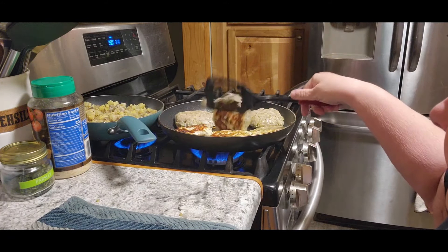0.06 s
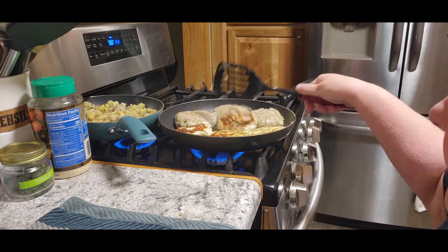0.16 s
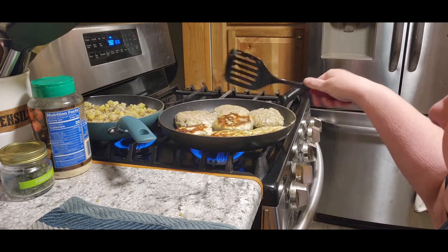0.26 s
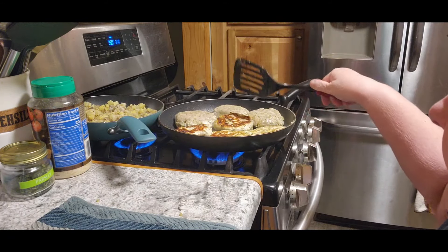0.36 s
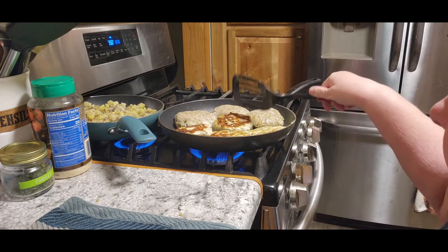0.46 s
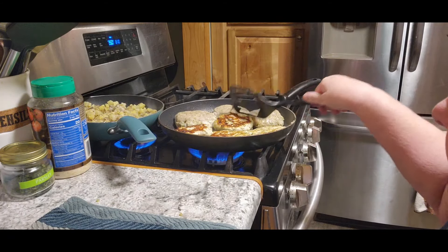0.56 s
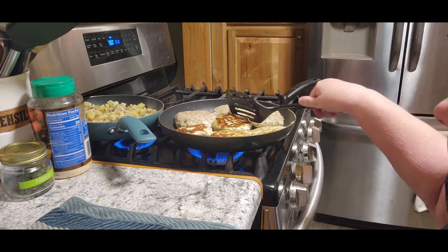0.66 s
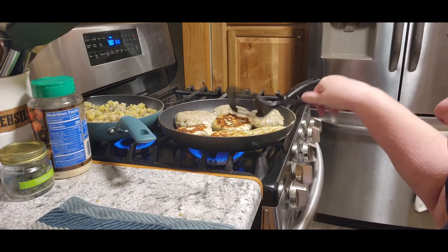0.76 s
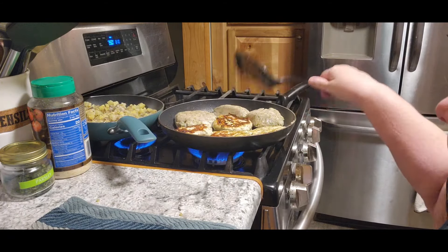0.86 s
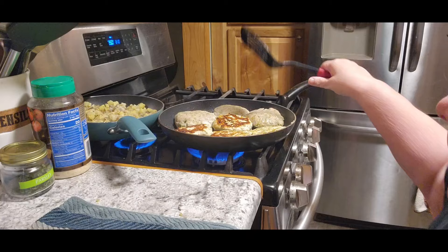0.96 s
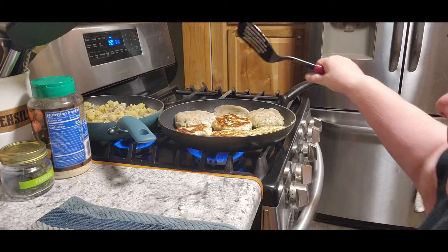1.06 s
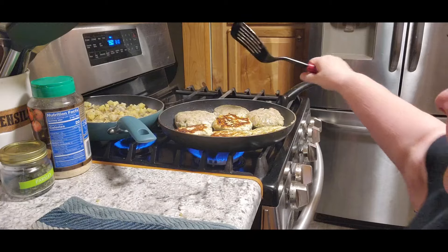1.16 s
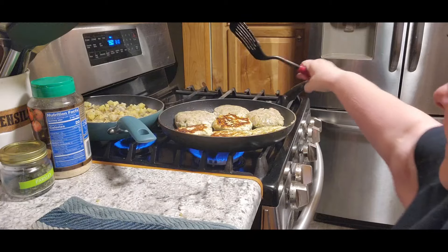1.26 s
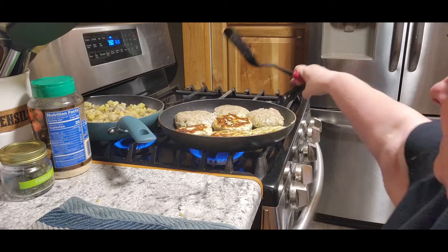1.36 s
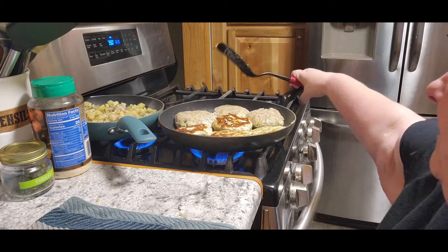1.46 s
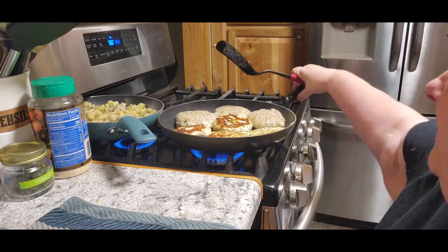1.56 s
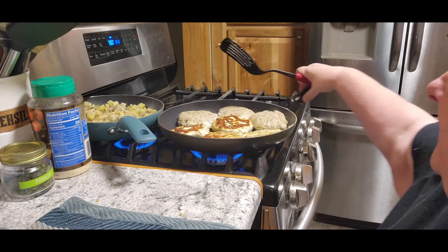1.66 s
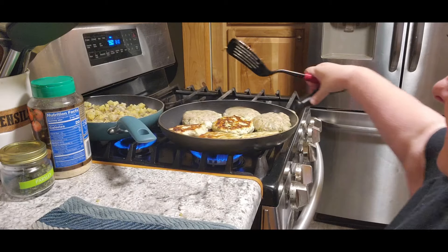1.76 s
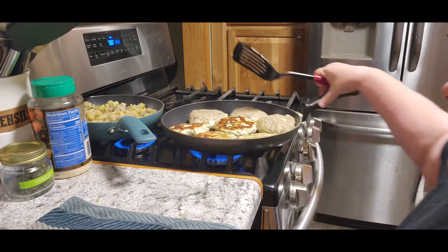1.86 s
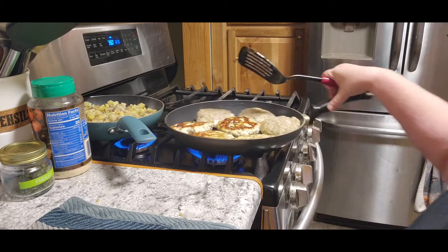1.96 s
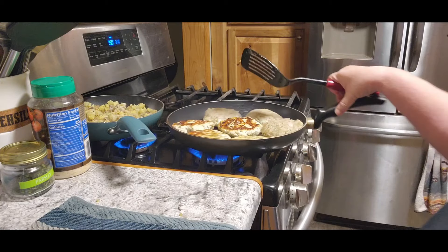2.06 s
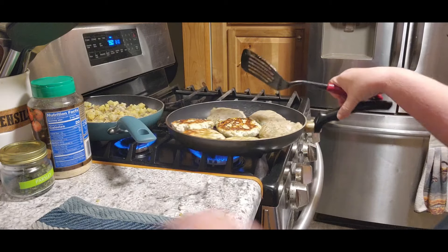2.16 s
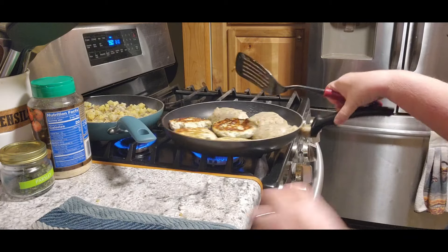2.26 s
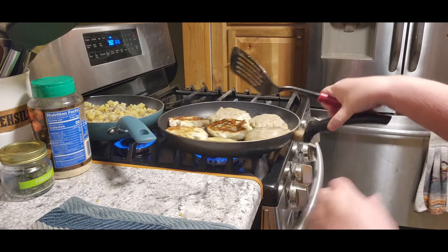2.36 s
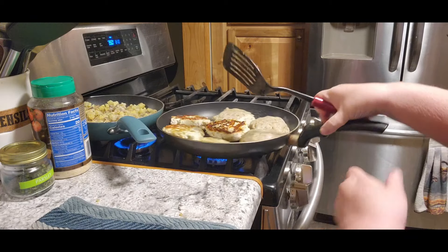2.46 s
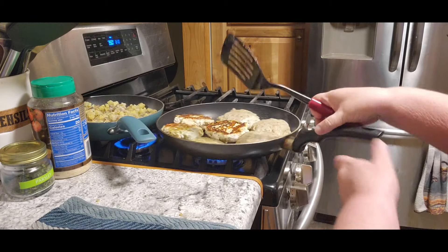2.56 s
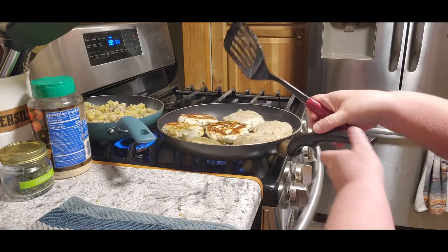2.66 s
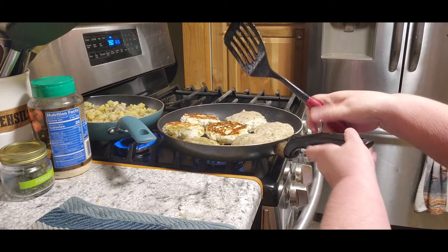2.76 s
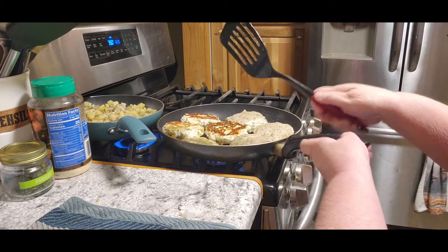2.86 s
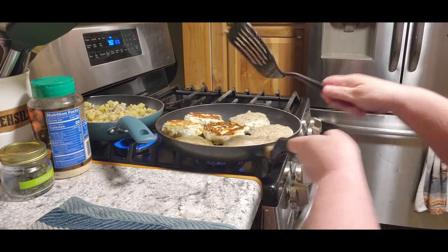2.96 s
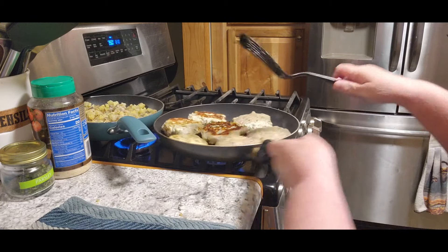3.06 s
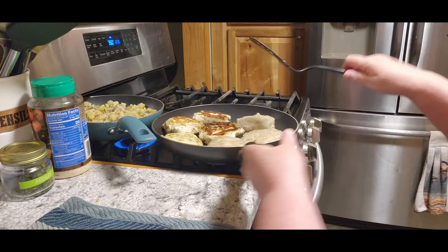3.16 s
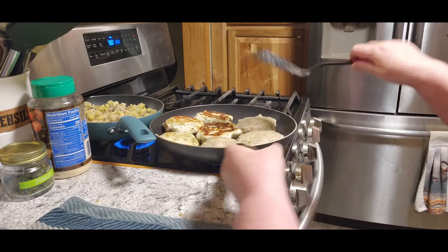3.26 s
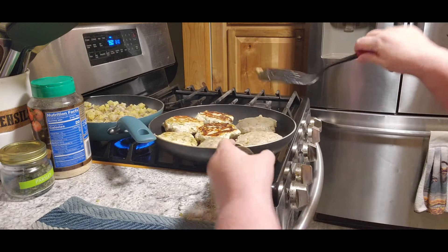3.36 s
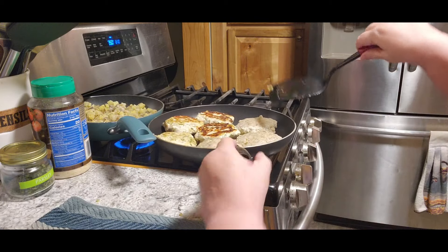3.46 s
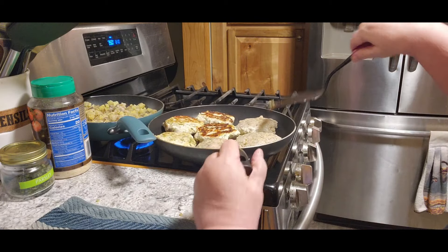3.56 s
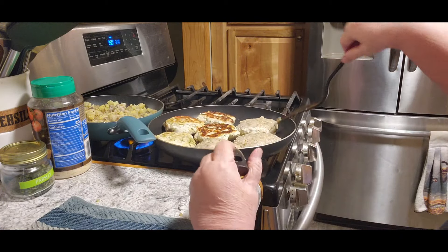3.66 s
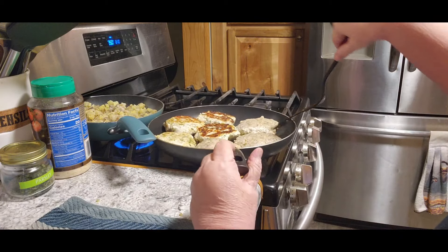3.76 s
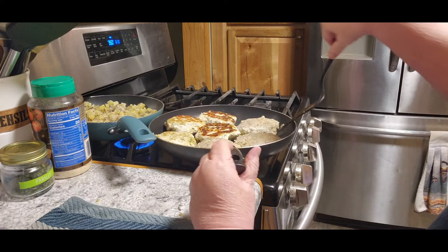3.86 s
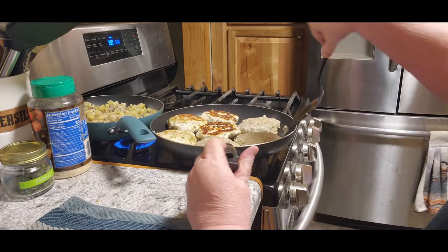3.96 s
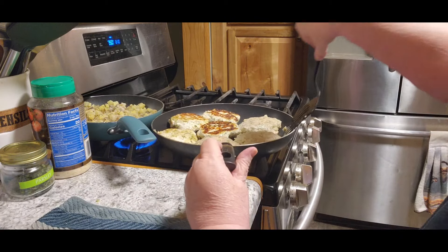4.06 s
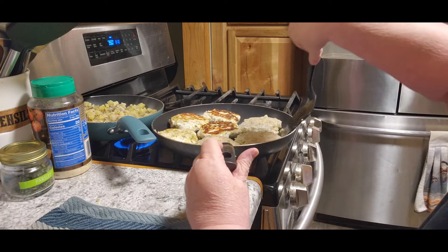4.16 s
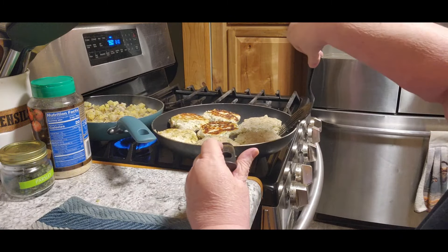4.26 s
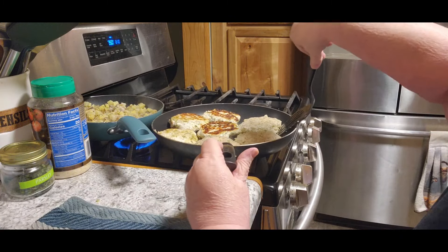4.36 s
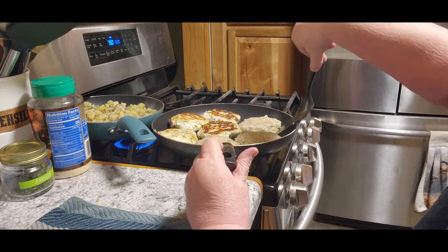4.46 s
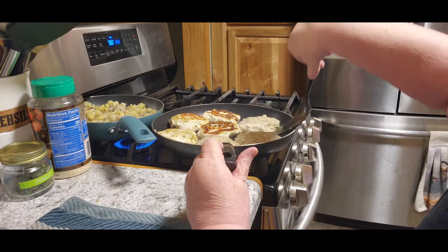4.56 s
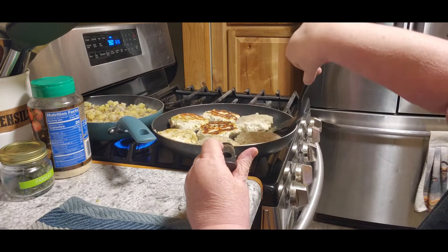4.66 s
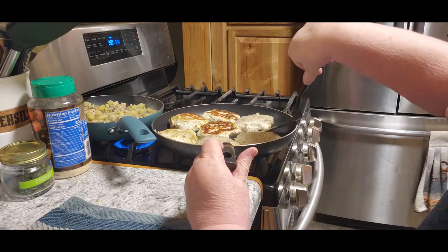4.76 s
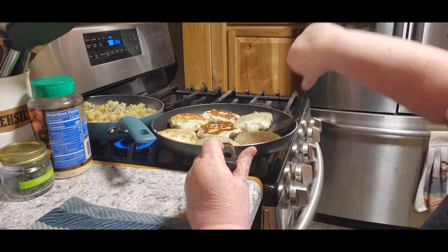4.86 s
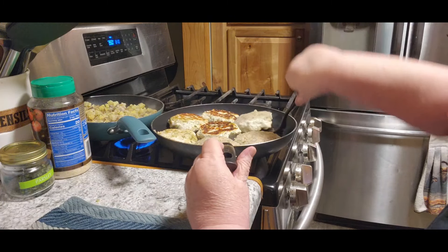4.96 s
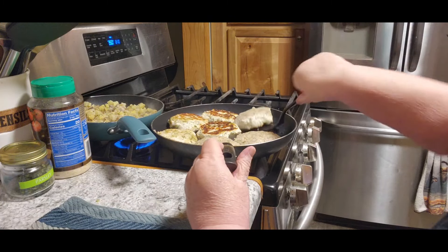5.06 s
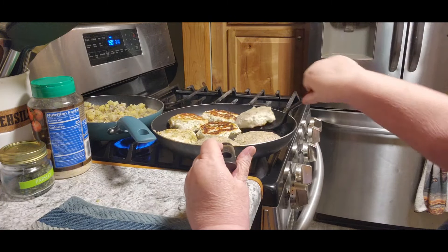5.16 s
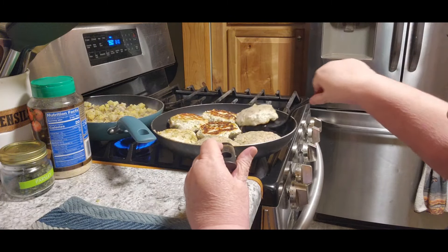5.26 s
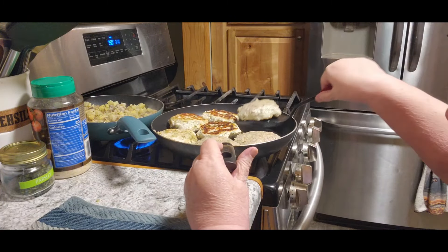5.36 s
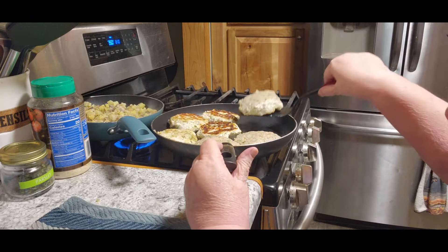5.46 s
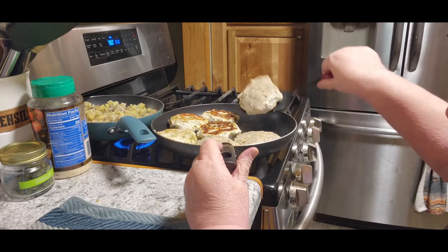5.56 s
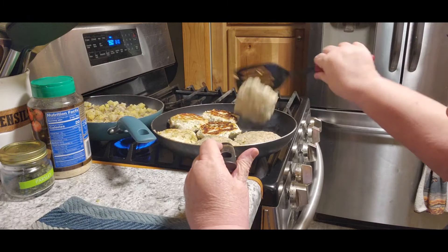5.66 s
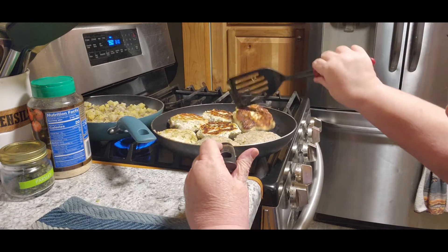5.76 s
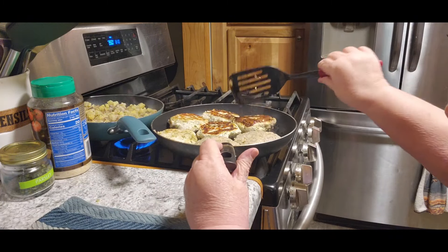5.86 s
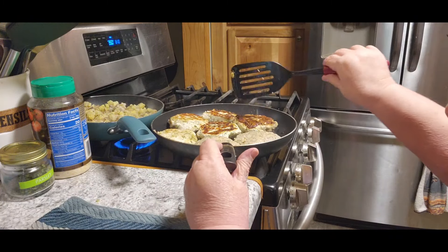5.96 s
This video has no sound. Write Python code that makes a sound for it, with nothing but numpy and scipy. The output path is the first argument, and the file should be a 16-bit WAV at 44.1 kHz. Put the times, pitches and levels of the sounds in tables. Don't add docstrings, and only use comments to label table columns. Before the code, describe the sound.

Meat patties sizzle steadily in hot oil in a skillet, with sharp pops, fat spits, faint pan knocks and low kitchen rumble.

```python
import sys
import numpy as np
from scipy import signal
from scipy.fft import rfft, irfft, next_fast_len
from scipy.io import wavfile
from scipy.ndimage import uniform_filter1d, map_coordinates

SR = 44100
rng = np.random.default_rng(int(sys.argv[2]) if len(sys.argv) > 2 else 0)


def magnitude_from_level(level_db):
    exponent = np.asarray(level_db, float) / 20
    return 10 ** exponent


def unload_audio(sound):
    columns = np.transpose(np.atleast_2d(sound))
    steps = np.round(np.clip(columns, -1, 1) * 32767)
    wavfile.write(sys.argv[1], SR, steps.astype(np.int16))


N = 265028

# (time [s], level [dB])
VIGOUR = [(0, -37), (.13, -37), (.2, -35), (.66, -36), (.85, -38), (1.0, -36.5), (1.68, -39), (1.81, -36),
          (1.93, -39), (2.05, -36), (2.45, -38.5), (2.8, -38), (3.9, -37.5), (4.85, -37), (5.05, -34),
          (5.24, -33.5), (5.39, -38.5), (5.47, -35.5)]
# (frequency [Hz], density [dB])
SIZZLE_SPECTRUM = [(1470, -39), (2500, -14.5), (3900, -5.5), (5560, 2), (6810, -3.5), (7590, 1.5),
                   (8610, -6.5), (10500, -12), (13600, -8.5), (22000, -120)]
SPRAY_SPECTRUM = [(5590, -31), (9500, -1.5), (10900, -2.5), (14300, 6), (14900, 5.5), (15500, 8.5),
                  (16000, 0)]
GURGLE_SPECTRUM = [(440, -28), (750, -10.5), (1260, -3), (1360, -6.5), (1440, -2), (1800, -1.5), (1930, -2),
                   (2140, 0.5), (2480, -2.5), (3200, -3), (4160, -8), (7040, -120)]
VENT_SPECTRUM = [(6300, -46), (7100, -8.5), (7450, -1), (7800, -5), (8150, -12), (9000, -40)]
SING_SPECTRUM = [(1900, -30), (2060, -5), (2150, 3), (2250, -12.5), (2450, -43)]
MURMUR_SPECTRUM = [(120, -31), (210, -13.5), (280, 0.5), (318, -8.5), (381, 1.5), (424, -9), (463, 1),
                   (499, -2.5), (598, -1.5), (850, -0.5), (1100, -10.5), (1870, -120)]
DRONE_SPECTRUM = [(32, -23), (52, -5), (81, -1), (97, -0.5), (120, 4), (146, 5), (162, 3), (215, -6),
                  (260, -15), (340, -45), (570, -120)]
RUMBLE_SPECTRUM = [(8.8, -29), (15, -15), (32, 13), (62, -8), (81, -39), (140, -120)]
# (time [s], lift [dB], fall [s], extra spray [dB])
FLARES = [(.2, -1.5, 0.071, 9), (.3, 0, .03, -3), (.46, 4, 0.02, -6), (.53, -2.5, .035, 2),
          (.585, 2, 0.018, -5), (.64, 3.5, 0.092, -3.5), (1.0, 1.5, 0.017, -1), (1.25, 1, 0.013, 4),
          (1.42, 3, 0.022, -1), (1.524, -3, .011, -8), (1.559, -0.5, 0.02, -1), (2.129, -1.5, .017, 8),
          (2.32, -0.5, .03, -2), (2.383, 4, 0.028, -9), (2.45, -1.5, .03, -2), (2.76, 2, 0.028, 3),
          (3.0, 2, 0.0099, -4), (3.1, 1, .015, -3), (3.27, 2, 0.013, 1), (3.38, 0.5, 0.0083, 5),
          (3.51, 0.5, 0.046, 2), (3.653, 2, 0.031, -4), (3.7, 0, .02, 6), (3.83, -0.5, 0.037, 4),
          (4.15, 2, 0.026, 1), (4.4, 5, 0.012, -17), (4.669, 1, 0.046, -2), (4.778, 5, 0.024, 1.5),
          (4.985, 0, 0.042, 8), (5.19, 0.5, 0.018, 4), (5.43, 0.5, 0.025, 2), (5.621, 2, 0.0076, 1),
          (5.946, -0.5, 0.01, 8), (5.985, -2, .03, 4.5)]
# (time [s], held [s], change [dB])
LULLS = [
    (.8, 0.22, 0),
    (1.25, 0.33, -2),
    (2.5, 0.48, 0),
    (3.0, .6, -1),
    (4.2, 0.53, -1),
    (5.32, 0.091, 1),
    (5.5, 0.23, -1.5),
]
# (time [s], peak [dB], ring [Hz], t60 [s], left minus right [dB])
SPITS = [(.2583, -30, 2160, .05, 1), (0.3933, -15, 1980, 0.062, 2), (0.6634, -13, 2050, 0.025, 7),
         (1.107, -17, 1453, 0.086, 2), (1.3174, -22, 2140, 0.063, 2.0), (1.7944, -15, 2260, 0.04, -5),
         (1.824, -18, 1650, 0.055, 1), (1.995, -17.5, 1730, 0.056, 1), (3.652, -33, 2120, .05, 1),
         (3.686, -2, 2600, 0.012, 1), (3.692, -5, 2380, 0.018, 5), (3.697, -10, 2330, 0.02, -1),
         (3.6865, -16, 3000, .02, 5), (3.711, -19, 2400, .02, 2), (3.7644, -18.5, 2080, 0.11, -1),
         (4.402, -18, 1080, 0.05, 1), (4.6706, -17, 1250, 0.068, 2), (4.772, -19, 2340, 0.06, 4),
         (4.7755, -25, 1800, 0.018, 2), (4.863, -19, 1700, 0.08, 2), (5.1557, -20, 1980, .04, 4),
         (5.216, -23, 1680, 0.092, 3), (5.235, -22, 2290, 0.065, 10), (5.2544, -19, 2160, 0.08, 12),
         (5.4146, -10.5, 2010, .03, 2), (5.744, -31, 2330, 0.04, 5), (5.8394, -13, 2040, 0.066, -1),
         (5.895, -18, 2154, 0.091, 1), (5.9394, -37, 2880, 0.04, 9)]
# (time [s], strength [dB], ring [Hz], left
# minus right [dB])
POPS = [(0.0302, -19, 5340, 3.3), (0.0776, -22.5, 7700, 7), (0.153, -23, 7620, 3), (0.3295, -28, 5749, 2.8),
        (0.3415, -28.1, 6610, 3.3), (0.4657, -25, 7800, 1.7), (0.5865, -21, 7900, 0.9),
        (0.6673, -26.2, 7751, 1.0), (1.252, -24, 7500, 2.8), (1.2614, -23, 6270, 3.5),
        (1.4106, -22, 7500, 3), (1.4605, -28.8, 7800, 3), (1.4749, -28.8, 7900, 1.6),
        (1.5248, -18, 5300, -1), (1.5338, -30.4, 5240, 2.1), (1.5604, -23, 5800, 3.2),
        (1.5677, -25, 5260, 1.2), (1.5838, -25, 5270, 3.6), (1.6327, -33, 5340, 2.8),
        (1.704, -28, 6287, -2), (1.7513, -29.2, 6180, 4), (1.8631, -23, 6430, 0.2), (2.06, -25, 5684, 3),
        (2.1292, -18.5, 5630, 3.1), (2.1759, -24, 7751, -1), (2.3834, -23, 5500, 0.9),
        (2.4662, -34, 6072, 2.9), (2.5071, -26, 5500, 4), (2.6393, -27, 7600, 7),
        (3.0015, -30.1, 7622, 2.4), (3.0998, -29.8, 4270, 4.0), (3.1087, -27, 5550, 2.6),
        (3.1636, -21, 5200, 1.9), (3.226, -27, 4900, -1), (3.3242, -48, 5490, -3), (3.365, -25, 5500, 0.3),
        (3.4284, -25, 5140, 1.0), (3.5058, -41, 6000, -4), (3.514, -19, 5921, -3), (3.654, -22, 7278, 2.8),
        (3.748, -26, 5300, 5.5), (4.0566, -20, 5570, 0), (4.4866, -34, 7200, 5.0), (4.5729, -32, 5383, -3),
        (4.7774, -23.8, 5460, 4), (4.972, -24, 5650, 0), (5.2045, -26, 5900, 0.9), (5.4336, -22, 8100, 5),
        (5.623, -22, 5857, 7), (5.9468, -20, 7428, 4.5),
        (.4823, -30, 4440, 2.5), (.5422, -31, 3010, 1.5), (0.745, -29, 3060, 1.5),
         (1.0036, -27, 4220, 2.5), (2.0926, -24, 4020, 1), (2.545, -28, 4220, 2.5), (2.7916, -31, 3640, 4),
         (4.7326, -54, 4160, 7), (4.93, -27, 4280, 2), (5.8112, -31, 3320, 2)]
# (time [s], held [s], level [dB])
VENTS = [(0, .05, -44), (.14, 0.11, -43), (.44, 0.044, -41), (.57, 0.083, -46), (1.15, 0.11, -61),
         (1.3, .1, -53), (1.452, .04, -43), (1.51, .04, -41), (1.595, 0.067, -48), (1.72, .12, -49),
         (2.022, 0.065, -45), (2.58, .22, -51), (5.0, 0.085, -53), (5.4, 0.077, -44), (5.815, 0.092, -41),
         (5.93, 0.043, -37)]
# (frequency [Hz], width [Hz], lift [dB])
PAN_MODES = [(1250, 69, -0.5), (2154, 220, 2), (3350, 130, 0.5), (5280, 130, 2.5), (7840, 34, 1),
             (8060, 69, -5), (14900, 60, 6)]
# (time [s], held [s], level [dB])
SINGS = [(0, .12, -52), (.2, .2, -52), (1.0, 0.07, -57), (1.3, 0.091, -54), (1.49, .15, -51.5),
         (1.7, .2, -52), (1.92, 0.11, -59), (2.06, 0.095, -50.5), (2.21, 0.046, -47), (2.9, 0.051, -59),
         (3.35, .05, -53), (3.725, 0.018, -53), (3.76, 0.033, -56), (3.87, 0.029, -51), (4.0, 0.12, -56),
         (4.602, .25, -58), (5.0, .08, -66), (5.22, 0.062, -44.5), (5.83, .18, -51)]
# (time [s], peak [dB], ring [Hz], thump re peak [dB], t60 [s])
KNOCKS = [(0.161, -40, 392, -16, 0.046), (1.829, -37, 490, -16, 0.054), (1.839, -44, 465, -17, 0.23),
          (3.775, -35, 436, -1, 0.051), (3.779, -38.5, 700, 6, 0.037), (3.791, -43, 813, 11, 0.058),
          (4.54, -46, 560, -26, .12), (4.574, -50, 526, -20, .08), (4.398, -45.5, 469, -13, 0.082),
          (4.663, -39, 397, -8, 0.052), (4.722, -40, 890, -20, .05), (5.314, -43, 617, 9, 0.058),
          (5.851, -36, 554, -5, 0.089), (5.862, -37, 760, -20, 0.017), (5.8677, -14.5, 666, -20, 0.029),
          (5.886, -34, 760, -20, 0.091), (5.909, -38.5, 518, 0, 0.07)]
# (time [s], held [s], lift [dB])
TUGS = [(0, 0.1, -3), (.2, 0.21, 5), (1.3, 0.055, -9), (1.8, 0.12, 11.5), (2.2, 0.17, 7), (2.45, 0.14, 9),
        (2.65, 0.079, 9.5), (2.95, 0.055, 3), (3.2, 0.22, 4), (3.55, 0.31, 1), (3.775, 0.034, 16),
        (3.82, 0.12, 7), (4.1, 0.052, 11.5), (4.33, 0.075, 8), (4.72, 0.11, 7), (4.99, 0.07, 11.5),
        (5.3, 0.073, 11.5), (5.46, 0.045, 15), (5.73, 0.049, 10), (5.86, 0.11, 13)]
# (time [s], held [s], level [dB])
JOLTS = [(0.21, .32, -53), (.215, .045, -51), (.345, 0.036, -50), (0.426, 0.087, -45), (0.774, .08, -59),
         (1.1, 0.14, -62), (1.88, 0.11, -55), (3.78, 0.15, -55), (4.4, .1, -66), (5.096, 0.077, -52),
         (5.855, .2, -42.5)]
# (frequency [Hz], level [dB rms])
HUM = [
    (46, -66.5),
    (75, -63.5),
    (152, -73),
]
# (frequency [Hz], left-right correlation [0..1])
LIKENESS = [(60, 0.97), (180, 0.97), (550, 0.86), (1650, 0.27), (4970, 0.029), (15000, 0.02)]
# (frequency [Hz], left minus right [dB])
LEAN = [(60, 1), (150, -1.5), (380, 1), (950, -1), (2380, 1.5), (5980, -0.5), (10000, -0.5), (13000, 1.5),
        (15000, 4)]

SPRAY_DB, GURGLE_DB = -4, -10.5
SPRAY_FOLLOWS, GURGLE_FOLLOWS = 0.4, 0.8
FLARE_RISE_S, LULL_EDGE_S = 0.0063, 0.032
LANDS_S, HUSH_DB, HUSH_S = 5.812, -4, 0.48
ROAR_DB, ROAR_RISE_S, ROAR_SPRAY_DB, ROAR_GURGLE_DB = 4, 0.01, 3.5, 1
SPRAY_LEAD_S, GURGLE_LAG_S = 0.015, 0.011
SPLASH_DB, SPLASH_S = 3.5, 0.027
JET_EDGE_S = 0.0073
RUMBLE_DB, DRONE_DB, SIMMER_DB = -71.5, -63, -62
JOLT_EDGE_S, TUG_EDGE_S, STIR_SHARE = 0.011, 0.041, 0.58
ECHO_DB = 19
TOP_HZ = 15510


def frying():
    sizzle_db, spray_db, gurgle_db = vigour()
    flare_db, flare_spray_db = flares()
    surge_db = flare_db + 0.15 * wobble(6.2) + 0.074 * wobble(20) + 0.43 * wobble(35)
    spray_db = spray_db + flare_spray_db + 1.56 * surge_db + 0.59 * wobble(11) + 0.23 * wobble(22.9)
    gurgle_db = gurgle_db + 1.2 * surge_db + 0.52 * wobble(7.5) + 1.0 * wobble(12)

    bursts = whitened(grains(count=24000, centre_hz=9100, octaves=0.93, cycles=0.84, spread_db=3.0, size=24))
    bubbles = whitened(grains(count=9000, centre_hz=5515, octaves=0.578, cycles=13.3, spread_db=3.5, size=300))
    blisters = whitened(grains(count=2400, centre_hz=1503, octaves=0.9, cycles=19.0, spread_db=2.0, size=1200))
    sizzle = coloured(rush(patchy_db=2.55) + 0.64 * bursts + 0.39 * bubbles, SIZZLE_SPECTRUM)
    spray = coloured(rush(patchy_db=1.2) + 0.38 * bursts, SPRAY_SPECTRUM)
    gurgle = coloured(rush(patchy_db=2.5) + 0.13 * bursts + 0.39 * blisters, GURGLE_SPECTRUM)
    return magnitude_from_level(sizzle_db + surge_db) * sizzle + magnitude_from_level(spray_db) * spray + magnitude_from_level(gurgle_db) * gurgle


def vigour():
    time_s, level_db = np.transpose(VIGOUR)
    db = np.interp(np.arange(N) / SR, time_s, level_db)
    mean_db = db.mean()
    swing_db = db - mean_db
    lull_db = sum(change_db * held(s, length_s, LULL_EDGE_S) for s, length_s, change_db in LULLS)
    hush_db = HUSH_DB * peak(LANDS_S, HUSH_S, ROAR_RISE_S)

    def roar(extra_db, late_s):
        return (ROAR_DB + extra_db) * step(LANDS_S + late_s, ROAR_RISE_S + abs(late_s) / 2)

    sizzle_db = db + hush_db + roar(0, 0) + SPLASH_DB / 3 * peak(LANDS_S, ROAR_RISE_S, SPLASH_S)
    spray_db = mean_db + SPRAY_DB + SPRAY_FOLLOWS * swing_db + roar(ROAR_SPRAY_DB, -SPRAY_LEAD_S)
    spray_db += SPLASH_DB * peak(LANDS_S + 0.008, SPRAY_LEAD_S, SPLASH_S)
    gurgle_db = mean_db + GURGLE_DB + GURGLE_FOLLOWS * swing_db + lull_db
    gurgle_db += roar(ROAR_GURGLE_DB, GURGLE_LAG_S)
    return sizzle_db, spray_db, gurgle_db


def flares():
    return sum(np.outer([db, spray_db], peak(s, FLARE_RISE_S, fall_s)) for s, db, fall_s, spray_db in FLARES)


def grains(count, centre_hz, octaves, cycles, spread_db, size):
    u, g = rng.random((count, 2)), rng.standard_normal((count, 3))
    hz = np.clip(centre_hz * 2 ** (octaves * g[:, :1]), 200, 17000)
    t = np.arange(size) / SR
    rise = 1 + 0.056 * t * hz / cycles
    wave = np.sin(2 * np.pi * hz * t * rise) * np.exp(-t * hz / cycles)
    wave *= np.hanning(2 * size)[size:]
    wave *= magnitude_from_level(spread_db * np.minimum(-np.log(1 - u[:, 1:]), 4)) * np.sqrt(hz / centre_hz)
    half_lag = (SR * (0.00007 * g[:, 1] ** 3 - 0.00005) / 2).round()
    pair = []
    for side in (1, -1):
        start = (u[:, 0] * N + 400 + side * half_lag).astype(int)
        at = start[:, None] + np.arange(size)
        heard = wave * magnitude_from_level(side * 3.2 * g[:, 2:])
        pair.append(np.bincount(at.ravel(), heard.ravel(), N + size + 999)[400:N + 400])
    return unit(np.array(pair))


def rush(patchy_db):
    z = signal.stft(rng.standard_normal((2, N + 512)), nperseg=512)[2]
    field = uniform_filter1d(rng.standard_normal(z.shape[1:]), size=5, axis=0)
    field = uniform_filter1d(field, size=6, axis=1)
    pair = signal.istft(z * magnitude_from_level(patchy_db * unit(field)), nperseg=512)[1][:, :N]

    def mid_side_gain(hz):
        angle = np.arccos(np.clip(along(LIKENESS, hz), -1, 1)) / 2
        return np.array([np.cos(angle), np.sin(angle)])

    mid, side = filtered(pair, mid_side_gain)
    return unit(np.array([mid + side, mid - side]))


def spits():
    out = np.zeros((2, N + SR))
    for s, db, hz, t60_s, pan_db in SPITS:
        wave = burst(SR // 8, hz, t60_s, rise_s=0.00031, drift_rad=0.021, hiss=0.15)
        out[:, round(s * SR):][:, :SR // 8] += magnitude_from_level(db - 22.0) * panned(pan_db) * wave
    return out[:, :N]


def pops():
    out = np.zeros((2, N + SR))
    for s, db, hz, pan_db in POPS:
        wave = burst(SR // 50, hz, t60_s=0.014, rise_s=0.00059, drift_rad=0.18, hiss=0.34)
        out[:, round(s * SR):][:, :SR // 50] += magnitude_from_level(db) * panned(pan_db) * wave
    return out[:, :N]


def burst(size, hz, t60_s, rise_s, drift_rad, hiss):
    t = np.arange(size) / SR
    drift = np.cumsum(rng.standard_normal((2, size)), axis=1) * drift_rad
    puff = hiss * np.diff(rng.standard_normal((2, size + 1)))
    fade = magnitude_from_level(-60 * t / t60_s) * (1 - np.exp(-t / rise_s))
    return (np.sin(2 * np.pi * hz * t + drift) + puff) * fade


def vents():
    jets = sum(magnitude_from_level(db) * held(s, length_s, JET_EDGE_S) for s, length_s, db in VENTS)
    return jets * magnitude_from_level(1.5 * wobble(55)) * coloured(rush(patchy_db=1), VENT_SPECTRUM)


def skillet(pair):
    delay_s = rng.uniform(0.007, 0.045, (2, 14, 1))
    sign = rng.choice([-1, 1], (2, 14, 1))
    grid_hz = np.arange(0, SR / 2 + 4, 4.0)
    gain = sign * magnitude_from_level(-ECHO_DB - 100 * delay_s - grid_hz / 2500)
    answer = 1 + (gain * np.exp(-2j * np.pi * grid_hz * delay_s)).sum(1)

    def response(f):
        lift_db = sum(db / (1 + (2 * (f - hz) / width_hz) ** 2) for hz, width_hz, db in PAN_MODES)
        echoes = [np.interp(f, grid_hz, a.real) + 1j * np.interp(f, grid_hz, a.imag) for a in answer]
        return magnitude_from_level(lift_db) * np.array(echoes)

    return magnitude_from_level(-0.52) * filtered(pair, response)


def grate():
    rings = sum(magnitude_from_level(db) * held(s, length_s, JET_EDGE_S) for s, length_s, db in SINGS)
    return rings * magnitude_from_level(1.2 * wobble(40)) * coloured(rush(patchy_db=1.5), SING_SPECTRUM)


def knocks():
    modes = [(1, 6.0), (0.366, -33), (0.84, -5.0), (1.25, -9), (1.55, -14)]  # (ratio, level [dB])
    out, t = np.zeros(N + SR), np.arange(SR // 4) / SR
    for s, db, hz, thump_db, t60_s in KNOCKS:
        tilt_db = rng.normal(0, 2.4, 5)
        ring = sum(magnitude_from_level(level_db + d) * np.sin(2 * np.pi * hz * ratio * t)
                   for (ratio, level_db), d in zip(modes, tilt_db))
        band = signal.butter(2, [0.82 * hz, 1.4 * hz], "bandpass", fs=SR)
        rattle = 0.28 * unit(signal.lfilter(*band, rng.standard_normal(len(t))))
        thump = magnitude_from_level(thump_db - 60 * t / 0.077) * np.sin(2 * np.pi * 151 * t)
        blow = (ring + rattle) * magnitude_from_level(-60 * t / t60_s) + thump
        out[round(s * SR):][:len(t)] += magnitude_from_level(db - 6.0) * blow * (1 - np.exp(-t / 0.0021))
    return out[:N]


def kitchen():
    rumble_db, drone_db, murmur_db = handling()
    t = np.arange(N) / SR
    rumble = magnitude_from_level(rumble_db) * coloured(rush(patchy_db=0.0), RUMBLE_SPECTRUM)
    sway = np.sin(2 * np.pi * np.cumsum(27 + 3 * wobble(8.8)) / SR)
    rumble = 0.6 * rumble + magnitude_from_level(rumble_db - 0.5) * sway
    hum = sum(magnitude_from_level(db + 1 + 2.5 * wobble(14)) * np.sin(2 * np.pi * hz * t + 0.6 * wobble(16)) for hz, db in HUM)
    blobs = whitened(grains(count=900, centre_hz=488.7, octaves=0.605, cycles=19.7, spread_db=0.5, size=1600))
    murmur = magnitude_from_level(murmur_db + 0.5) * coloured(rush(patchy_db=-2.5) + 0.42 * blobs, MURMUR_SPECTRUM)
    burner = magnitude_from_level(drone_db + 0.73 * wobble(11)) * coloured(rush(patchy_db=1.6), DRONE_SPECTRUM)
    return rumble + hum + murmur + burner


def handling():
    shake_power = sum(magnitude_from_level(2 * db) * held(s, length_s, JOLT_EDGE_S) for s, length_s, db in JOLTS)
    rest = magnitude_from_level(1.9 * (RUMBLE_DB + 1.8 * wobble(12.0)))
    rumble_db = 10 * np.log10(rest + shake_power)
    tug_db = sum(db * held(s, length_s, TUG_EDGE_S) for s, length_s, db in TUGS)
    return rumble_db, DRONE_DB + tug_db, SIMMER_DB + STIR_SHARE * tug_db + 0.66 * wobble(7.3)


def unit(x):
    return x / np.sqrt(np.mean(x ** 2) + 1e-20)


def panned(left_minus_right_db):
    return magnitude_from_level([[left_minus_right_db / 2], [-left_minus_right_db / 2]])


def along(points, hz):
    f, v = np.transpose(points)
    return np.interp(np.log(hz + 1), np.log(f + 1), v)


def wobble(rate_hz):
    return map_coordinates(rng.standard_normal(400), [np.arange(N) * rate_hz / SR])


def peak(s, rise_s, fall_s):
    t = np.arange(N) / SR
    return np.exp(-np.where(t < s, (s - t) / rise_s, (t - s) / fall_s))


def step(s, rise_s):
    return 0.5 + 0.5 * np.tanh((np.arange(N) / SR - s) / rise_s)


def held(s, length_s, edge_s):
    return step(s, edge_s) * (1 - step(s + length_s, edge_s))


def filtered(x, response):
    m = next_fast_len(N + 8192)
    return irfft(rfft(x, m) * response(np.fft.rfftfreq(m, 1 / SR)), m)[..., :N]


def coloured(pair, spectrum):
    out = filtered(pair, lambda hz: magnitude_from_level(along(spectrum, hz)))
    return out / np.std(out.mean(0))


def whitened(pair):
    hz, power = signal.welch(pair, SR, nperseg=128)
    floored = power.mean(0) + 0.00019 * power.max()
    return unit(filtered(pair, lambda f: np.interp(f, hz, floored) ** -0.5))


def scene():
    return skillet(frying() + spits()) + kitchen() + knocks() + vents() + pops() + grate()


def roll_off(x):
    return signal.sosfilt(signal.butter(12, 15870, fs=SR, output="sos"), x)


def record(dry):
    def microphones(hz):
        return magnitude_from_level(np.outer([0.5, -0.5], along(LEAN, hz) + 1.06)) * (hz < TOP_HZ)

    return roll_off(filtered(dry, microphones))


dry = scene()
out = record(dry)
unload_audio(out)
```